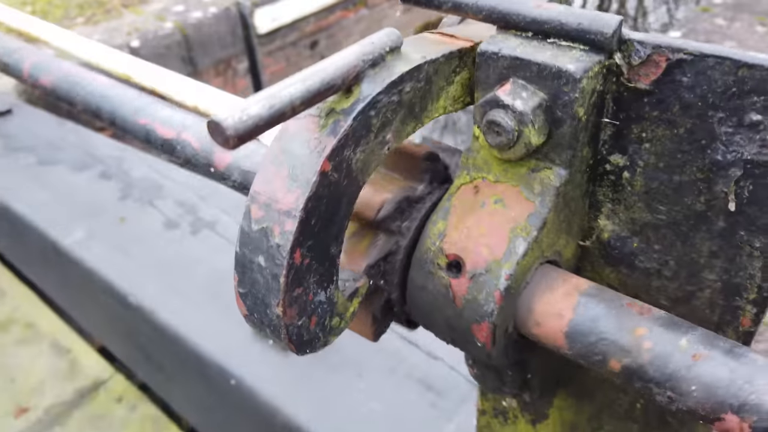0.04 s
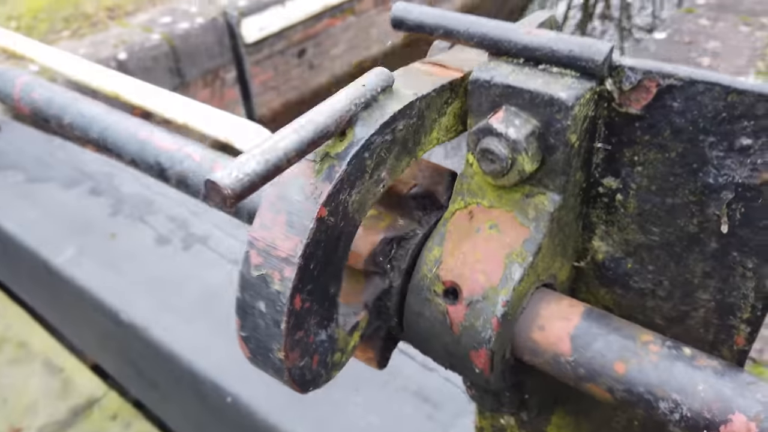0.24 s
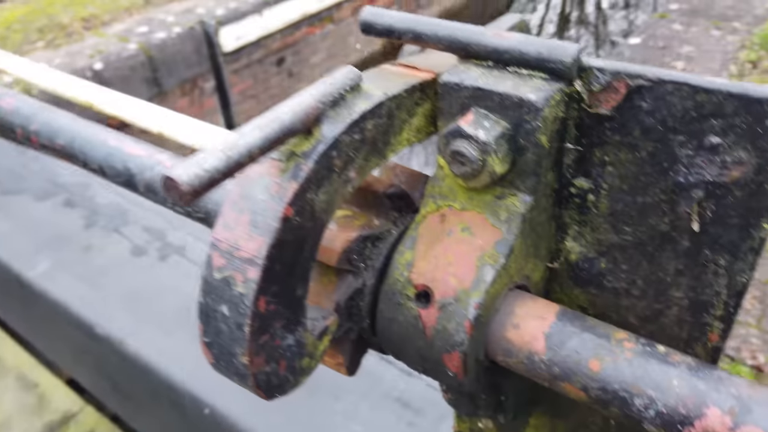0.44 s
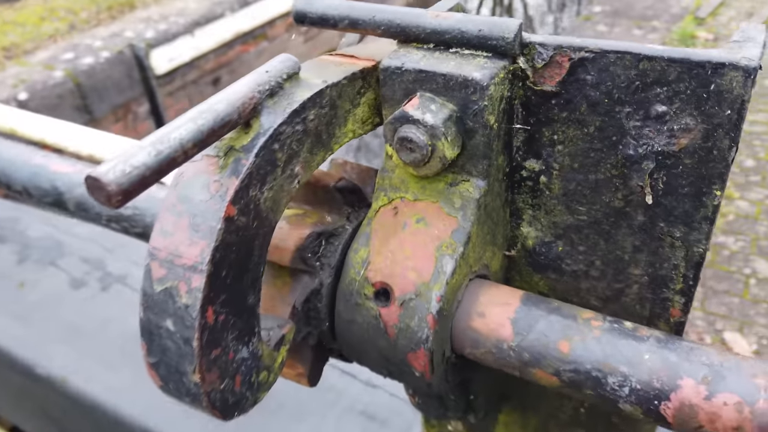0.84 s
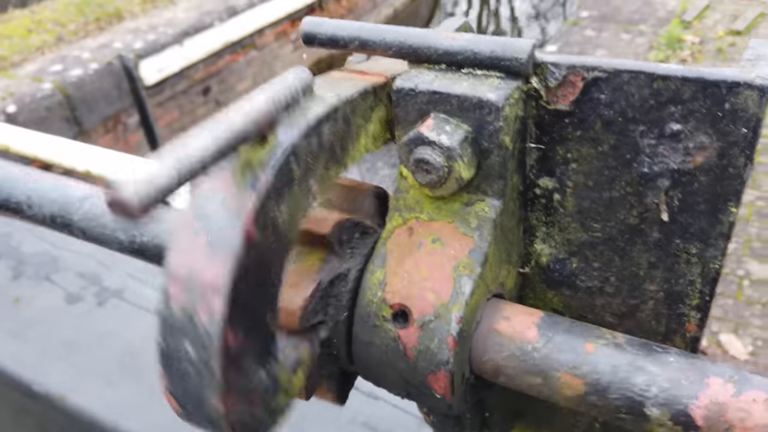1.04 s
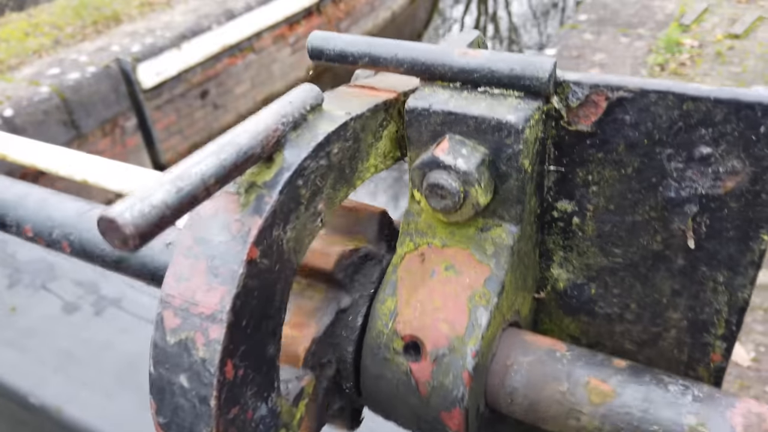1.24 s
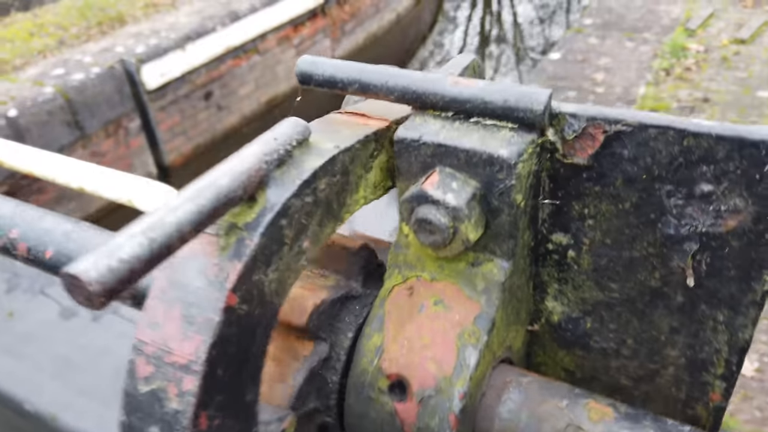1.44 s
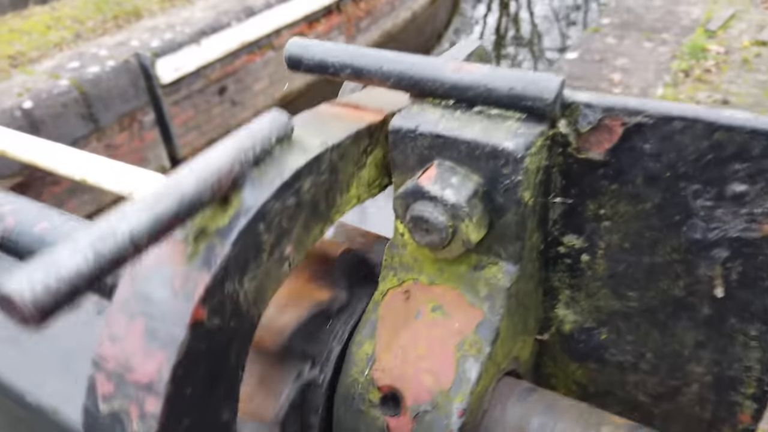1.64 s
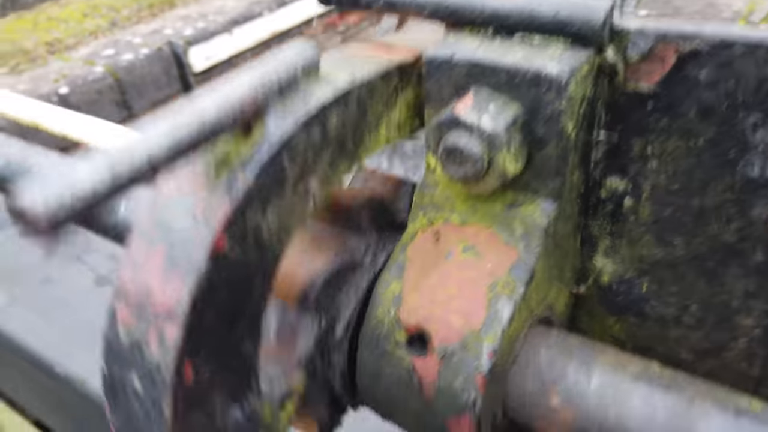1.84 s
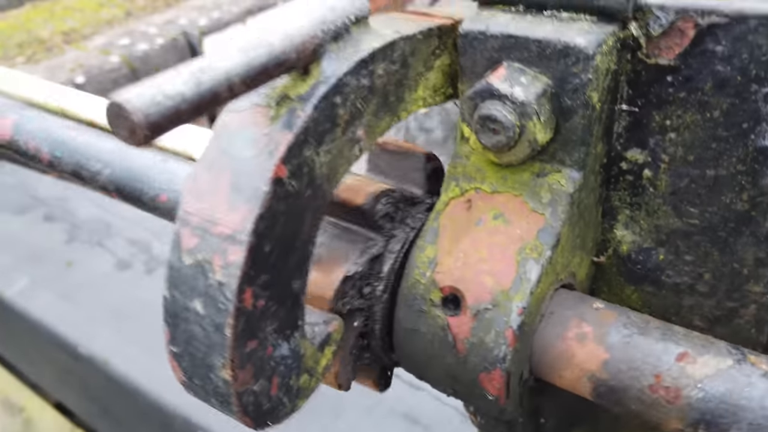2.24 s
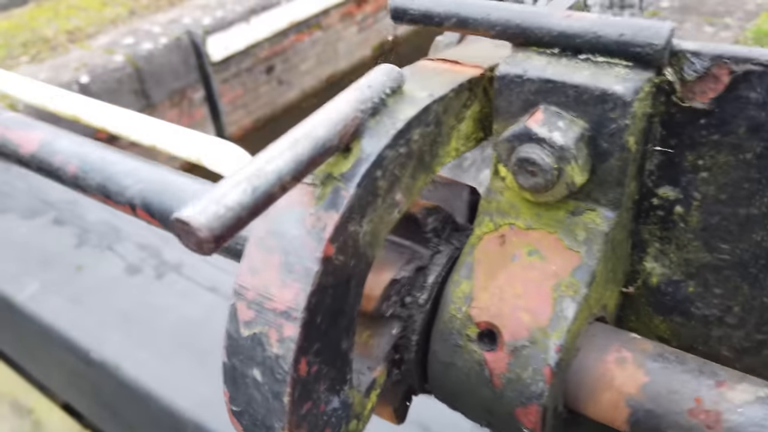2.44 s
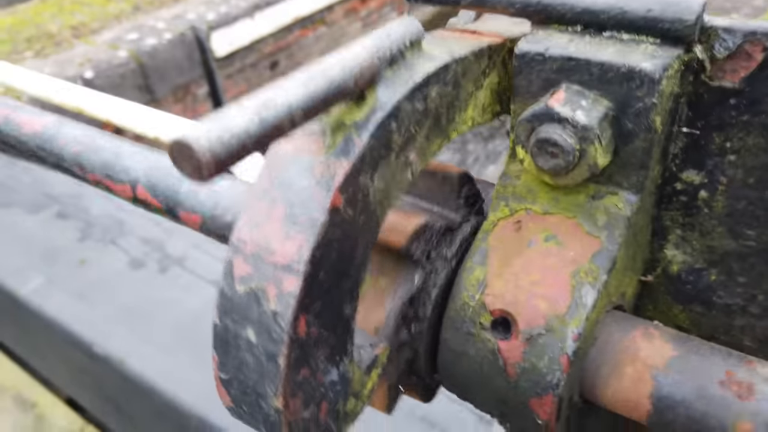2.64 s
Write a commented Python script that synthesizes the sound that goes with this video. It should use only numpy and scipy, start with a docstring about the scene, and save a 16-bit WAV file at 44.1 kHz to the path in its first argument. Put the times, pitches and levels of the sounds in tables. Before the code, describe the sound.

A heavy iron ratchet pawl drops onto gear teeth with two ringing clanks, a thin squeal between them. The gear rubs softly in a pause, then six more clanks follow steadily, close by at an outdoor canal lock.

```python
"""A lock paddle is wound up, close by and outdoors: its gear rubs over quiet air and a low drone.
A heavy iron pawl drops onto a tooth, rings, rebounds and clanks through the gear frame; the gate
booms after it and the lock walls answer with a short tail. The pawl squeals up the next tooth and
drops again. The gear rubs and knocks in a pause, then six more drops follow at a steady pace.
Automatic gain control ducks just after each blow."""
import sys
import numpy as np
from scipy import signal
from scipy.io import wavfile
from scipy.ndimage import uniform_filter1d, minimum_filter1d

SR = 44100
rng = np.random.default_rng(int(sys.argv[2]) if len(sys.argv) > 2 else 0)


def to_wav(s):
    """Save 16-bit WAV."""
    ch = np.atleast_2d(s).T  # columns
    pcm = np.round(np.clip(ch, -1, 1) * 32767)  # PCM
    wavfile.write(sys.argv[1], SR, pcm.astype(np.int16))


N = 119070
TIME = np.arange(N) / SR
BAND_EDGES_HZ = 20 * 2 ** (np.arange(30) / 3)

# outdoor air bed: (frequency [Hz], level per third octave [dB])
AIR_SPECTRUM = [(25, -64.5), (45, -67.5), (62, -65.5), (85, -70.5), (160, -72.5), (400, -78), (1000, -86),
                (3000, -85), (8000, -94), (15500, -100)]
# low drone: (pitch [Hz], level [dB])
DRONE_TONES = [(30, -59), (61, -57)]
# swell of the rubbing gear: (time [s], level [dB])
RUB_LEVELS = [(0, -62), (.45, -66), (.53, -66), (.62, -60), (.72, -60), (.8, -60.5), (.85, -65.5),
              (.89, -75.5), (1.1, -71), (1.5, -65.5), (2.0, -67), (2.7, -81.5)]
# colour of the rub: (frequency [Hz], gain per third octave [dB])
RUB_SPECTRUM = [(100, -22), (300, -9), (700, -8), (1800, -8), (3000, -10), (4500, -12.5), (6200, -11.5),
                (10000, -14.5), (15500, -29)]
# pawl drops, each tooth with its own colour: (time [s], strength [dB], bass [dB], clank [dB],
# treble [dB], clank centre [Hz], low ring [dB], main ring [dB], upper ring [dB], top ring [dB],
# ring length [factor], rebound [dB], tail [dB])
DROPS = [(0.0555, -1.5, -4.5, 5, 0.5, 960, 5, -0.5, -6.5, 1, 0.74, -3, 5.5),
         (.3047, -1, -5.5, 2.5, -2, 940, 3, 2.5, -5.5, -7.5, 0.77, -4.5, 2),
         (1.1832, -3.5, 0.5, 2, 4.5, 950, 6, 2.5, -3, 4.5, 0.74, 9.5, 8),
         (1.4137, -1.5, 3.5, 4.5, 2, 690, 0, -4, 2.5, 1.5, 0.88, -11, -2),
         (1.6719, -2, 3, 5, 0.5, 2400, -2, -5.5, 12, 6.5, 0.9, 7, 0),
         (1.9006, -4, 2.5, 0.5, 5, 1250, 7, -5, 4.5, 5.5, 0.88, -3, -2.5),
         (2.1408, -2.5, 0, 7.5, 1, 1080, 4.5, -2.5, 0.5, -7, 0.89, 2.5, 2),
         (2.4157, -1.5, -4.5, 4.5, -1.5, 1260, -5.5, -2.5, 1, -5.5, 0.62, -0.5, -1)]
# modes of the pawl: (pitch [Hz])
PAWL_HZ = [1872, 2030, 3326, 3525, 5332, 6642, 8855, 9576, 10771, 11014, 11956, 12629, 14992, 15460]
# balance of those modes: (level [dB])
PAWL_DB = [-29, -34, -29, -11.5, -23.5, -24, -38, -34.5, -44, -42, -47, -49.5, -46.5, -62.5]
# their decay before a drop's ring length scales it: (t60 [s])
PAWL_BASE_T60_S = [0.22, 0.28, .24, 0.11, 0.15, 0.11, 0.33, 0.11, 0.28, 0.17, 0.29, .22, .1, .11]
# modes of the gear wheel and its frame: (pitch [Hz])
FRAME_HZ = [470, 705, 937, 1120, 1432, 1615, 2115, 2265, 2594, 3062, 3885, 4112, 4840, 5189]
# balance of those modes: (level [dB])
FRAME_DB = [-28.5, -25, -15, -20, -18.5, -24, -26.5, -23.5, -26, -24.5, -27, -27, -28, -26.5]
# boom of the gate: (pitch [Hz], level [dB], t60 [s])
GATE_MODES = [(123.4, -35, .3), (158, -42, 0.42), (253, -41.5, .3), (430.3, -44.5, 0.63)]
# dense ring of the ironwork: (frequency [Hz], level per third octave [dB], t60 [s])
CLATTER_BANDS = [(90, -56.5, 0.58), (170, -33.5, 0.17), (362, -27, 0.19), (700, -27.5, 0.18),
                 (1080, -23.5, .13), (1800, -25, .13), (2840, -27.5, 0.088), (4020, -15, 0.093),
                 (5080, -25, 0.088), (6400, -30, 0.033), (8540, -37, .09), (12000, -47, .07),
                 (15500, -58, .06)]
# bright tick of the pawl's one bounce: (frequency [Hz], level per third octave [dB])
REBOUND_SPECTRUM = [(100, -63), (1000, -29.5), (4500, -27.5), (7000, -25.5), (10000, -27), (13000, -43),
                    (15500, -46)]
# tail from the lock walls: (frequency [Hz], level per third octave [dB], t60 [s])
TAIL_BANDS = [(100, -50.5, 0.58), (220, -47.5, .55), (500, -57.5, 0.68), (1000, -56, 0.5),
              (1990, -41, 0.15), (4170, -51.5, .42), (7000, -81, 0.17), (14620, -78.5, .4)]
# light touches of the pawl on a tooth: (time [s], strength [dB])
PAWL_TOUCHES = [(0.12, -42), (1.175, -30), (1.209, -19), (2.196, -18)]
# swell of the pawl's squeal: (time [s], level [dB])
SQUEAL_LEVELS = [(.125, -82), (.145, -55), (.195, -49), (.215, -55), (.26, -47), (.29, -46.5), (.31, -72.5)]
# knocks of play in the gear: (time [s], level [dB], centre [Hz])
GEAR_KNOCKS = [(.777, -53, 600), (.795, -59, 1300), (.916, -51.5, 430), (1.031, -57, 1100),
               (1.033, -48, 310), (1.118, -65, 1500), (1.13, -55, 369), (1.608, -66.5, 1450),
               (2.072, -65.5, 1200)]

CONTACT_RISE_S, BUILD_CYCLES = .0007, .97   # a struck ring builds over the contact plus about a cycle


def from_db(db):
    """Decibels to gain."""
    return 10 ** (np.asarray(db) / 20)


def unit_rms(x):
    """Scale to unit rms."""
    return x / np.sqrt(np.mean(x ** 2) + 1e-20)


def at_hz(rows, hz, column=1):
    """Read one column of a table on a log-frequency axis."""
    rows = np.array(rows)
    return np.interp(np.log(hz), np.log(rows[:, 0]), rows[:, column])


def in_time(rows):
    """Join (time, value) points by straight lines."""
    return np.interp(TIME, *np.transpose(rows))


def drift(rate_hz):
    """Smooth random wobble of unit rms."""
    pole = np.exp(-2 * np.pi * rate_hz / SR)
    return unit_rms(signal.lfilter([1], [1, -2 * pole, pole * pole], rng.standard_normal(N + SR))[SR:])


def noise_bands():
    """Third-octave noises of unit rms, as (centre [Hz], samples)."""
    white = rng.standard_normal((2, N + SR // 4))
    for k, (low, high) in enumerate(zip(BAND_EDGES_HZ, BAND_EDGES_HZ[1:])):
        sos = signal.butter(2, [low, high], "band", fs=SR, output="sos")
        yield np.sqrt(low * high), unit_rms(signal.sosfilt(sos, white[k % 2])[-N:])


def add(out, start_s, sound):
    """Mix a sound in at a time."""
    i = max(int(start_s * SR), 0)
    out[i:i + len(sound)] += sound[:max(N - i, 0)]


def strike_envelope(t60, build_s):
    """A ring builds over the contact plus its own build time, then dies away."""
    t = TIME[:int(SR * min(2 * t60, 1))]
    return -np.expm1(-t / (build_s + CONTACT_RISE_S)) * from_db(-60 * t / t60)


def bell_curve(hz, centre_hz, width_oct):
    """A broad resonant bump, 1 at its centre."""
    return 1 / (1 + (np.log2(hz / centre_hz) / width_oct) ** 2)


def drop_colour_db(hz, bass_db, clank_db, treble_db, clank_hz):
    """How hard one drop drives a frequency: a tilt about the mids and one clank peak."""
    tilt_db = at_hz([(443, bass_db), (1200, 0), (4500, treble_db)], hz)
    return tilt_db + clank_db * bell_curve(hz, clank_hz, width_oct=.25)


def ring_colour_db(hz, low_db, main_db, upper_db, top_db):
    """Where the pawl lands decides which of its modes sing out."""
    return at_hz([(2030, low_db), (3400, main_db), (5332, upper_db), (6642, 0),
                  (8855, top_db), (9576, top_db / 2)], hz)


def struck_mode(hz, db, t60, build_s, spread_db=.8):
    """One decaying sine, a little different in level and phase on every blow."""
    envelope = from_db(db + spread_db * rng.normal()) * strike_envelope(t60, build_s)
    return envelope * np.sin(2 * np.pi * (hz * TIME[:len(envelope)] + rng.random()))


def outdoors():
    """A bed of quiet air and a low, slowly wavering drone."""
    air = sum(from_db(at_hz(AIR_SPECTRUM, hz)) * noise for hz, noise in noise_bands())
    drone = sum(from_db(db) * np.sin(2 * np.pi * hz * TIME + 1.3 * drift(rate_hz=3.1))
                for hz, db in DRONE_TONES)
    return air + drone


def turning_gear(grain_db=2.4):
    """The gear rubs with a grainy hiss, and its play gives a few dull knocks."""
    out = np.zeros(N)
    rub = from_db(in_time(RUB_LEVELS) + grain_db * drift(rate_hz=160))
    knock = strike_envelope(t60=.097, build_s=.0015)
    for hz, noise in noise_bands():
        gain = rub * from_db(at_hz(RUB_SPECTRUM, hz))
        for start, db, centre_hz in GEAR_KNOCKS:
            add(gain, start, knock * from_db(db) * bell_curve(hz, centre_hz, width_oct=.77) ** 2)
        out += gain * noise
    return out


def ringing_iron(twin_spread_hz=10, twin_db=-10.5, frame_detune=.012, frame_t60=.091, gate_lag_s=.028):
    """Every drop rings the pawl, clanks the gear frame and, a moment later, booms the gate."""
    out = np.zeros(N)
    for start, db, bass, clank, treble, clank_hz, low, main, upper, top, length, *_ in DROPS:
        for hz, level, base_t60 in zip(PAWL_HZ, PAWL_DB, PAWL_BASE_T60_S):
            ring_db = db + level + ring_colour_db(hz, low, main, upper, top)
            t60, build_s = base_t60 * length, BUILD_CYCLES / hz
            add(out, start, struck_mode(hz, ring_db, t60, build_s))
            twin_hz = hz + twin_spread_hz * rng.normal()   # a close twin makes the ring beat
            add(out, start, struck_mode(twin_hz, ring_db + twin_db, t60, build_s))
        for hz, level in zip(FRAME_HZ, FRAME_DB):
            detuned_hz = hz * (1 + frame_detune * rng.normal())
            frame_db = db + level + drop_colour_db(hz, bass, clank, treble, clank_hz)
            add(out, start, struck_mode(detuned_hz, frame_db, frame_t60, BUILD_CYCLES / hz))
        for hz, level, t60 in GATE_MODES:
            add(out, start + gate_lag_s, struck_mode(hz, db + level + bass / 2, t60, build_s=.0042))
    return out


def clatter(onset_s=.018, onset_db=-1, rebound_lag_s=.0082):
    """Countless short modes of the ironwork blur into noise at each drop, rebound and light touch."""
    out = np.zeros(N)
    softened_onset = from_db(onset_db / (1 + (TIME / onset_s) ** 8))
    for hz, noise in noise_bands():
        if hz < CLATTER_BANDS[0][0]:
            continue
        level, build_s = at_hz(CLATTER_BANDS, hz), BUILD_CYCLES / hz
        blow = strike_envelope(at_hz(CLATTER_BANDS, hz, column=2), build_s)
        blow *= softened_onset[:len(blow)]
        tick = strike_envelope(t60=.013, build_s=build_s) * from_db(at_hz(REBOUND_SPECTRUM, hz))
        touch = strike_envelope(t60=.03, build_s=build_s)
        gain = np.zeros(N)
        for start, db, bass, clank, treble, clank_hz, *_, rebound_db, _ in DROPS:
            colour_db = drop_colour_db(hz, bass, clank, treble, clank_hz)
            add(gain, start, blow * from_db(db + level + colour_db))
            add(gain, start + rebound_lag_s, tick * from_db(db + rebound_db))
        for start, db in PAWL_TOUCHES:
            add(gain, start, touch * from_db(db + level))
        out += gain * noise
    return out


def lock_tail():
    """Diffuse reflections off the lock walls bloom and die after every drop."""
    out = np.zeros(N)
    for hz, noise in noise_bands():
        if hz < TAIL_BANDS[0][0]:
            continue
        bloom = strike_envelope(at_hz(TAIL_BANDS, hz, column=2), build_s=.015)
        power = np.zeros(N)
        for start, db, *_, tail_db in DROPS:
            add(power, start, (bloom * from_db(db + tail_db + at_hz(TAIL_BANDS, hz))) ** 2)
        out += np.sqrt(power) * noise
    return out


def pawl_squeal(pitch_hz=3325, waver=.0052, octave_db=-16.5):
    """The pawl rides up a tooth: a thin, wavering friction tone with its octave."""
    phase = 2 * np.pi * np.cumsum(pitch_hz * (1 + waver * drift(rate_hz=120))) / SR
    tone = np.sin(phase) + from_db(octave_db) * np.sin(2 * phase)
    sliding = (TIME > SQUEAL_LEVELS[0][0]) & (TIME < SQUEAL_LEVELS[-1][0])
    return sliding * from_db(in_time(SQUEAL_LEVELS)) * tone


def duck(x, threshold_db=-18, share=.57, lag_s=.008, attack_s=.0025, release_db_per_s=324.5):
    """Gain control lets the attack through, then takes off a share of the level above threshold."""
    level_db = 10 * np.log10(np.maximum(uniform_filter1d(x ** 2, size=128), 1e-12))
    late_db = np.interp(TIME - lag_s, TIME, level_db)
    cut_db = share * np.maximum(late_db - threshold_db, 0)
    release_db = release_db_per_s * TIME
    held_db = np.maximum.accumulate(cut_db + release_db) - release_db
    pole = np.exp(-1 / (attack_s * SR))
    return x * from_db(-signal.lfilter([1 - pole], [1, -pole], held_db))


def limit(x, ceiling_db=-4.6, window_s=.002):
    """A limiter eases the gain down around each peak."""
    window = int(window_s * SR)
    safe_gain = np.minimum(1, from_db(ceiling_db) / (np.abs(x) + 1e-9))
    return x * uniform_filter1d(minimum_filter1d(safe_gain, window), window)


def scene():
    """The pawl's blows up front, with gear, squeal and outdoor bed, in mono."""
    blows = ringing_iron() + clatter() + lock_tail()
    return (blows + turning_gear() + pawl_squeal() + outdoors())[None]


def record(dry):
    """Duck after each blow, limit the peaks and cut the very top."""
    high_cut = signal.ellip(10, .2, 80, 15750, fs=SR, output="sos")
    return signal.sosfilt(high_cut, limit(duck(dry[0])))[None]


dry = scene()
out = record(dry)
to_wav(out)
```